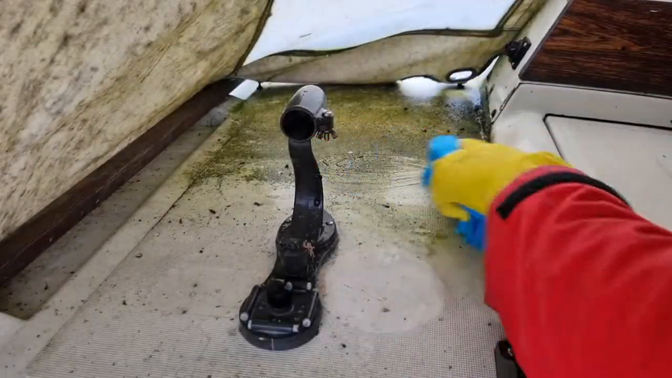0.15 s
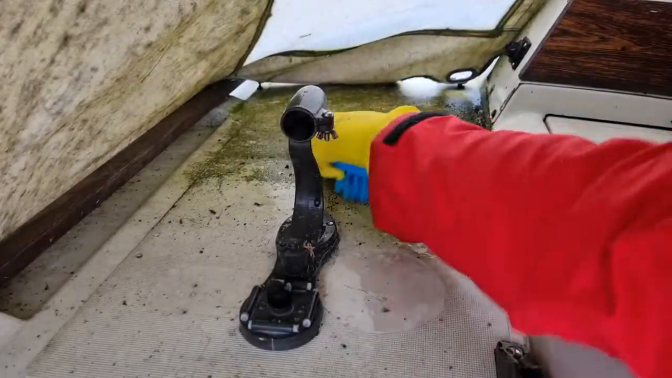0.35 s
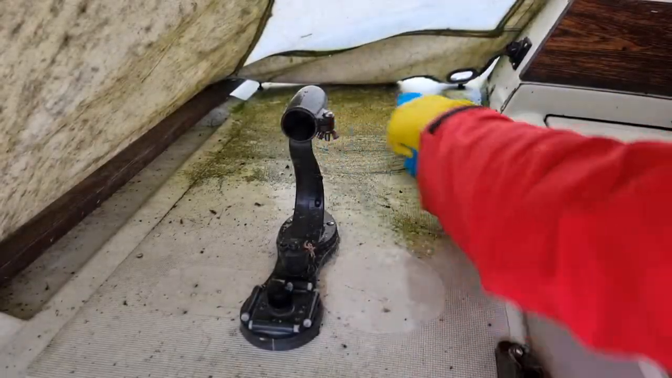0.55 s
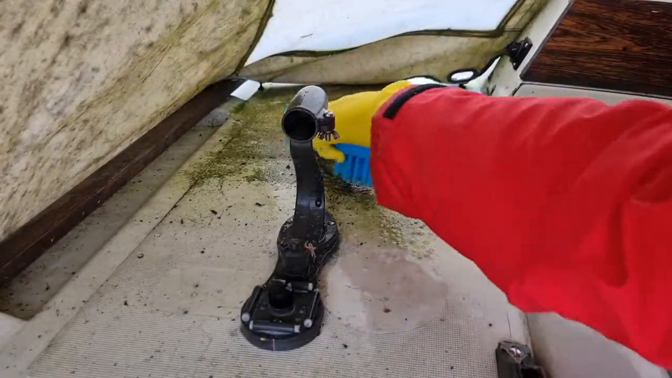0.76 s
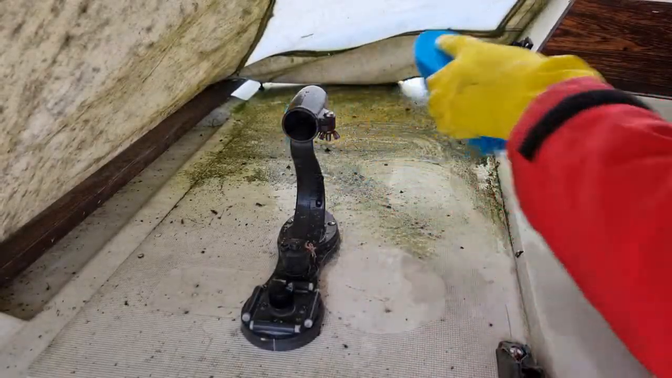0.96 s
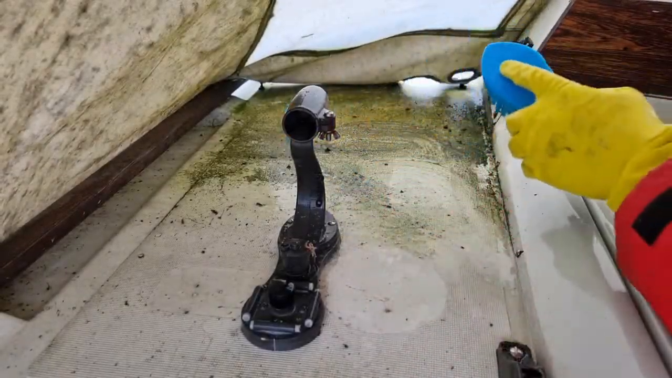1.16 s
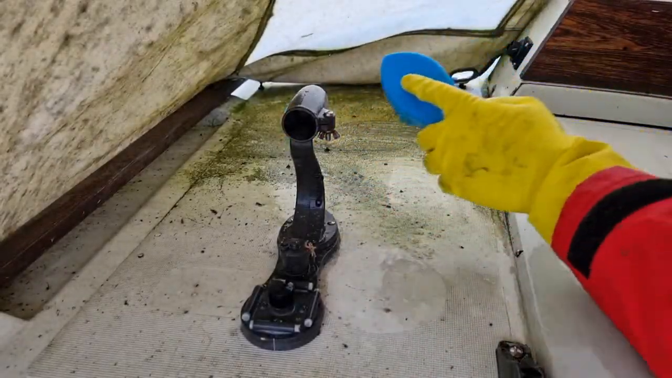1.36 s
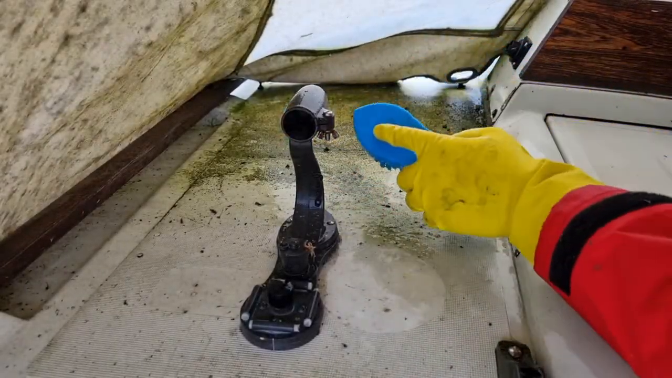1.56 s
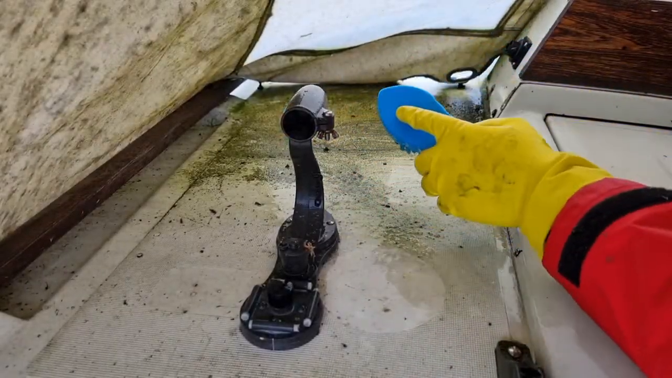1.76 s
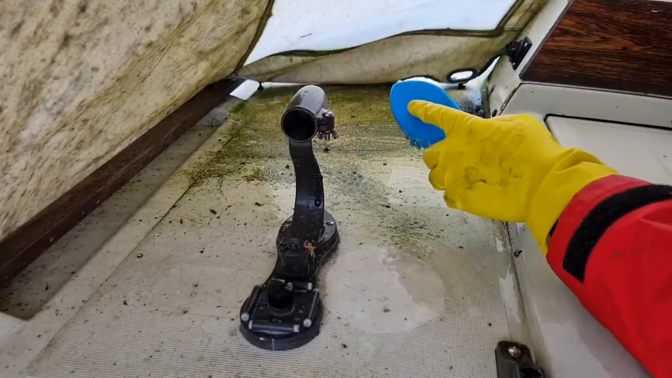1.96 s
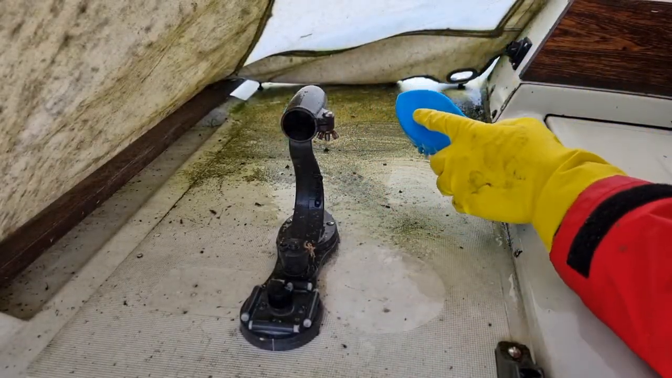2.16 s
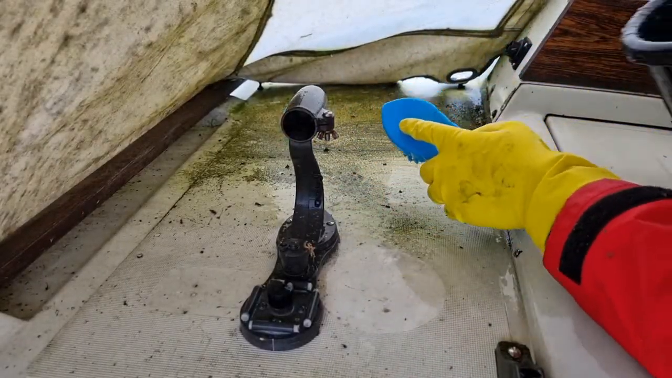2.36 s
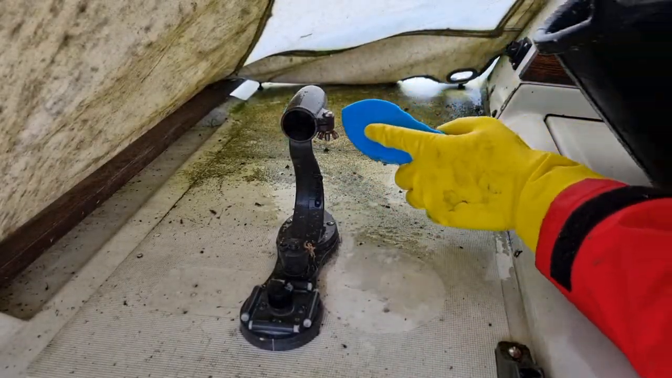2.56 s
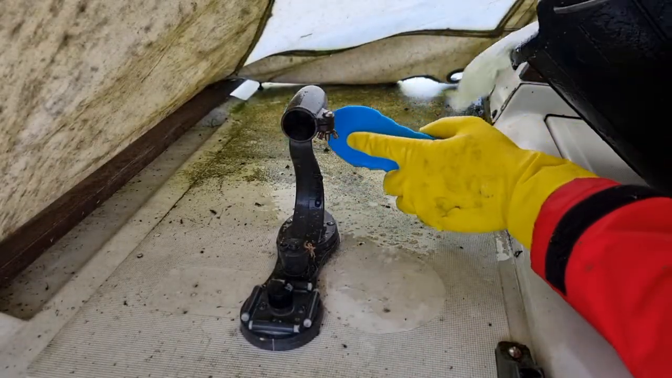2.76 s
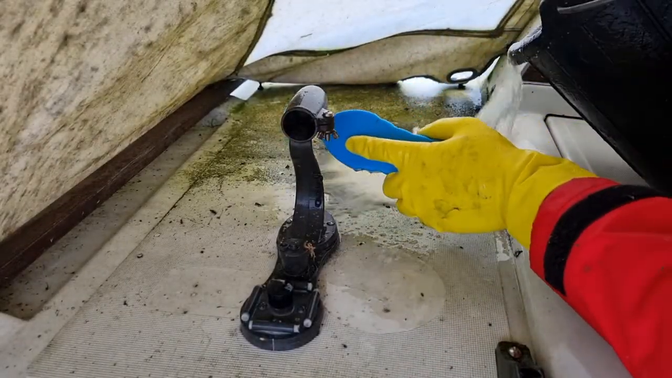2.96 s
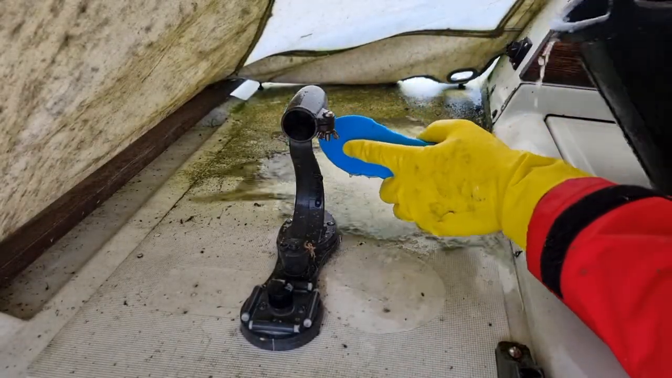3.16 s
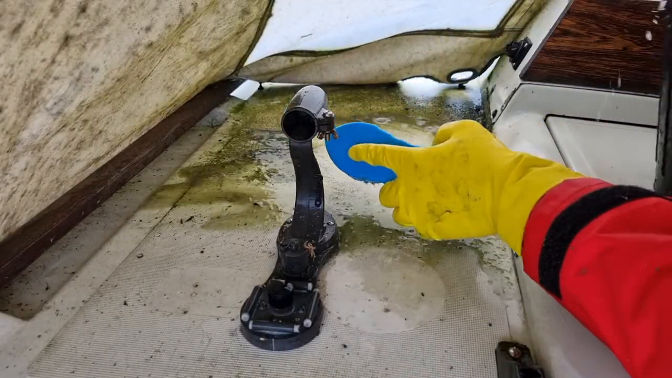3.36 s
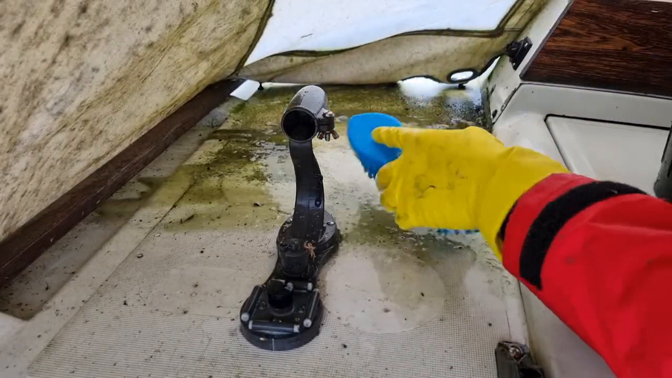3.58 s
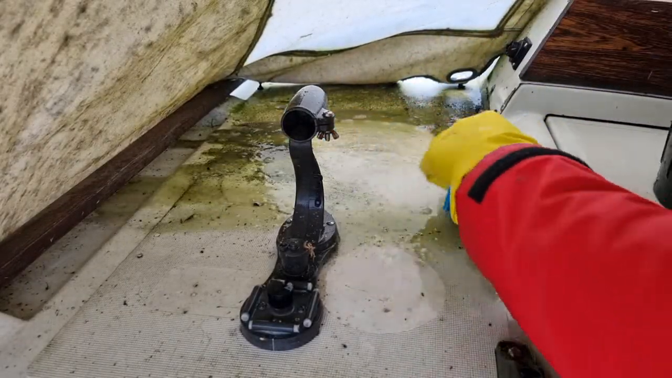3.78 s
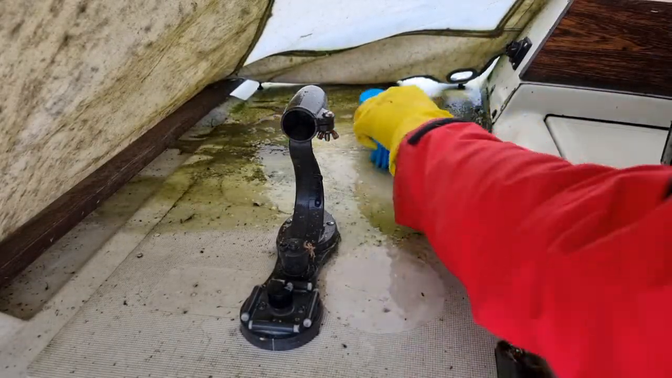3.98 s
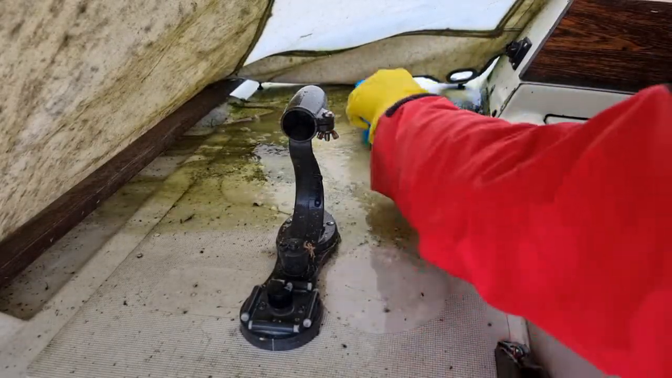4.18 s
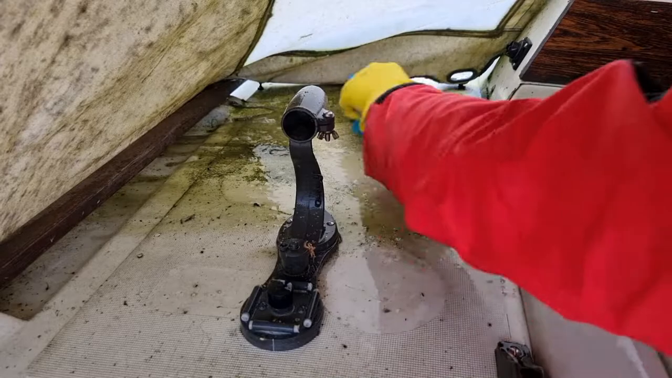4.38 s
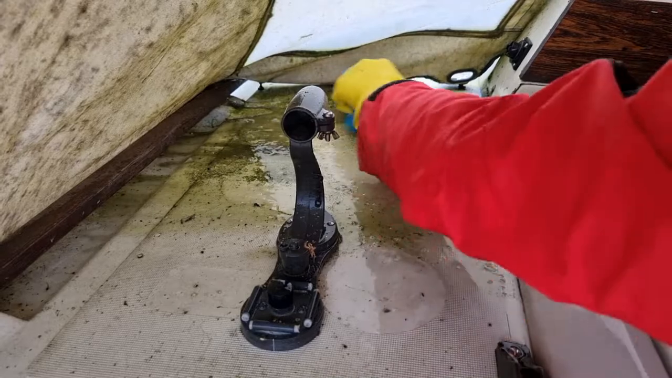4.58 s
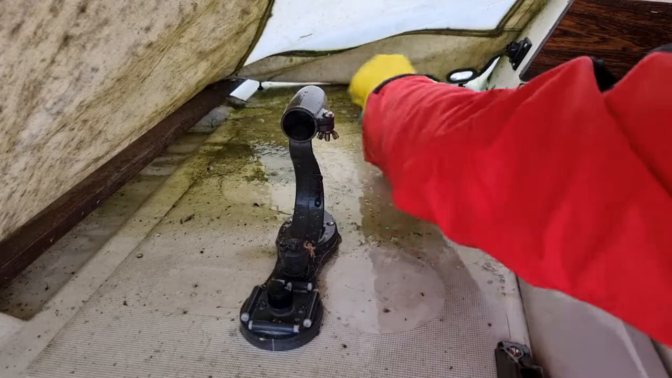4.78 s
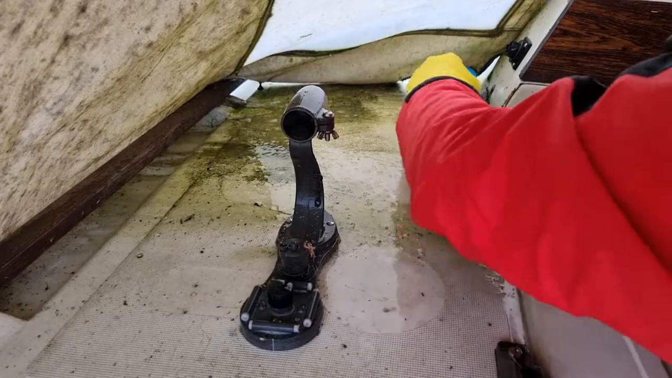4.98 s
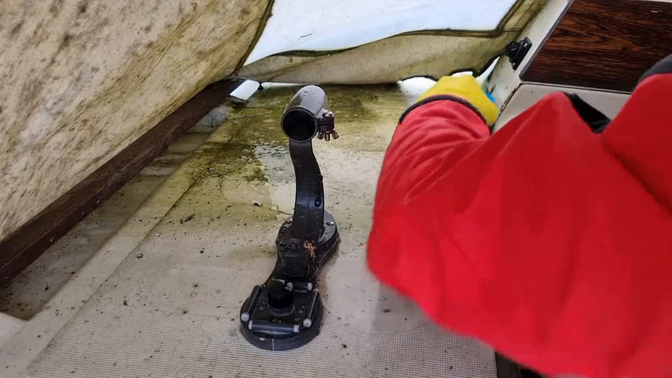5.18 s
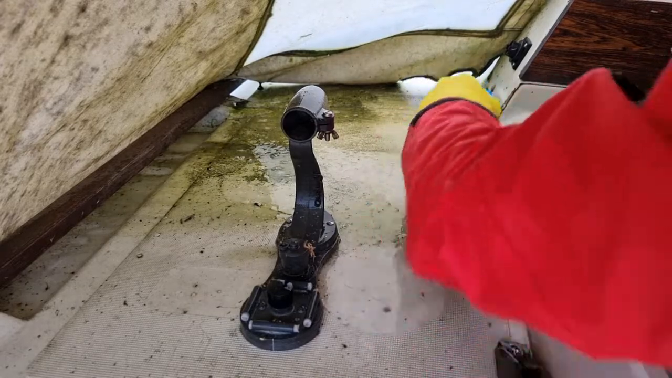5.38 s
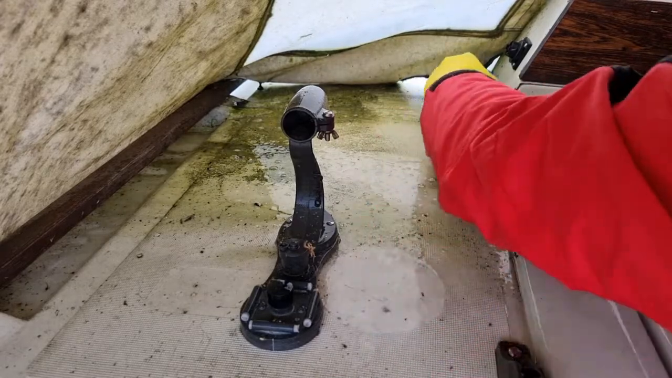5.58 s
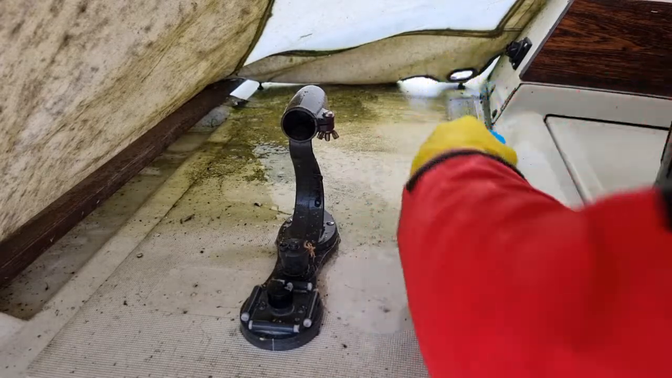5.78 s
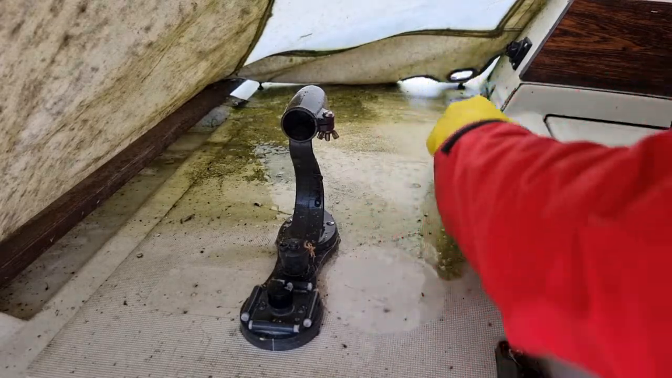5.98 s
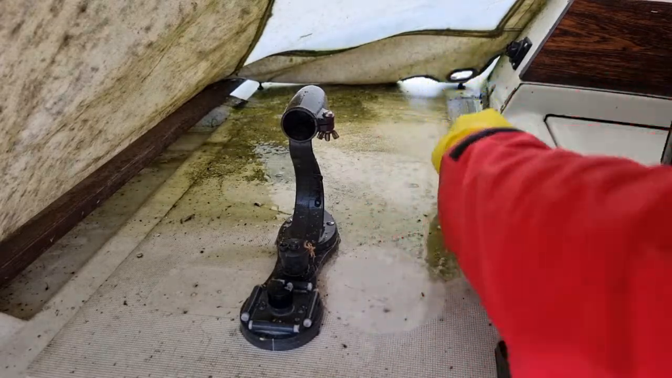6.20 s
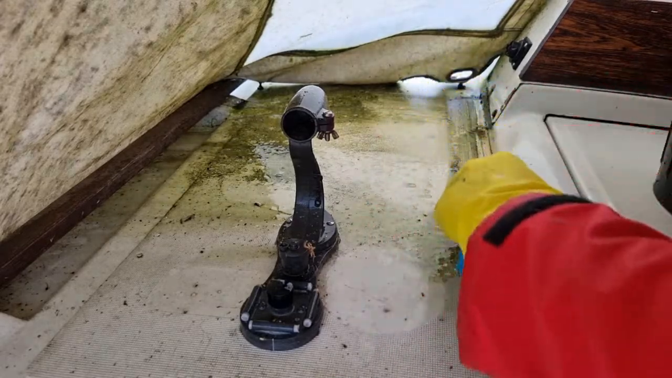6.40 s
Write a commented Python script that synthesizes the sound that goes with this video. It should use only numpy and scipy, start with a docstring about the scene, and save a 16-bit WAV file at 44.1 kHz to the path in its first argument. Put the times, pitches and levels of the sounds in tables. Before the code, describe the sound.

A stiff brush scrubs a wet hollow boat floor in raspy bursts, pausing while a bucket handle clinks and water slaps down, then knocking harder.

```python
"""A stiff brush in a gloved hand scrubs the wet fibreglass floor of a boat cockpit, under a canvas cover.
In stereo: shaped noise hisses in quick strokes, then long ones; damped modes ring as its back knocks on the deck.
In the pause a bucket is fetched: its wire handle clinks (modes driven by noise), and water is tipped out
(slaps and stream of noise, ringing bubbles). Behind it the hull rumbles, a jacket rustles and faint air hangs."""
import sys
import numpy as np
from scipy import signal
from scipy.fft import rfft, irfft, next_fast_len
from scipy.io import wavfile
from scipy.ndimage import map_coordinates

SR = 44100
rng = np.random.default_rng(int(sys.argv[2]) if len(sys.argv) > 2 else 0)


def output_pcm(signal):
    """Save a mono or channel-first signal as 16-bit PCM at the path in sys.argv[1].

    Samples are clipped to [-1, 1] before scaling.
    """
    pcm = np.clip(np.atleast_2d(signal).T, -1, 1) * 32767
    wavfile.write(sys.argv[1], SR, np.round(pcm).astype(np.int16))


N = 284004  # length [samples]


def amp(db):
    """Decibels to gain."""
    return 10 ** (np.asarray(db) / 20)


def unit(x):
    """Scaled to rms 1."""
    return x / np.sqrt(np.mean(x ** 2) + 1e-20)


def along(points, hz):
    """(frequency [Hz], value) points read on a log frequency axis."""
    f, v = np.transpose(points)
    return np.interp(np.log(hz + 1), np.log(f + 1), v)


def wobble(rate, size=N):
    """A smooth random curve with `rate` knots a second."""
    knots = rng.standard_normal(int(size * rate / SR) + 4)
    return map_coordinates(knots, [np.arange(size) * rate / SR])


def swells(rows):
    """A gain that rises and falls once for each (middle [s], length [s], level [dB]) row."""
    t = np.arange(N) / SR
    return sum(amp(db) * np.cos(np.pi * np.clip((t - s) / length, -.5, .5)) for s, length, db in rows)


def filtered(x, response):
    """x shaped by a gain that is a function of frequency."""
    n = x.shape[-1]
    m = next_fast_len(n + 4096)
    return irfft(rfft(x, m) * response(np.fft.rfftfreq(m, 1 / SR)), m)[..., :n]


# likeness of the left and right microphones: (frequency [Hz], correlation)
CHANNEL_LIKENESS = [(60, 0.27), (130, 0.34), (300, 0.28), (640, 0), (1400, 0), (15000, 0.016)]


def grains(spectrum, spiky_db, size=N):
    """Dense tiny impacts of scattered size in a spectrum, stereo, rms 1."""
    flicks = rng.standard_normal((2, size)) * amp(spiky_db * wobble(1500, size=size))

    def mid_and_side(hz):
        turn = np.arccos(np.clip(along(CHANNEL_LIKENESS, hz), -1, 1)) / 2
        return amp(along(spectrum, hz)) * [np.cos(turn), np.sin(turn)]

    mid, side = filtered(flicks, mid_and_side)
    return unit(np.array([mid + side, mid - side]))


def ring(modes, t, scatter_db):
    """Damped modes, reaching each microphone at its own random strength and phase."""
    hz, db, t60 = np.transpose(modes)[:, :, None]
    level = db + scatter_db * rng.standard_normal((2, len(modes), 1))
    phase = rng.uniform(0, 2 * np.pi, (len(modes), 1)) + 0.8 * rng.standard_normal(level.shape)
    return np.sum(amp(level - 60 * t / t60) * np.sin(2 * np.pi * hz * t + phase), axis=1)


def add(out, s, x, pan_db=0):
    """Mix a stereo sound in at time s; pan_db is left minus right."""
    i = round(s * SR)
    a, b = max(i, 0), min(i + x.shape[1], N)
    out[:, a:b] += x[:, a - i:b - i] * amp([[pan_db / 2], [-pan_db / 2]])


def glancing(x, progress, delay_ms, sweep, share, count=3):
    """x plus its bounces off near walls; a sweep above 0 shortens their paths as progress grows."""
    n, out = np.arange(x.shape[1]), x.copy()
    for k in range(1, count + 1):
        lag = k * delay_ms * SR / 1000 * rng.uniform(.8, 1.2) * (1 - sweep * progress / k ** 2)
        lags = lag + rng.normal(0, 1.04, (2, 1))  # each microphone hears the bounce at a slightly different time
        bounce = np.array([np.interp(n - d, n, c) for d, c in zip(lags, x)])
        out += share / np.sqrt(k) * bounce
    return unit(out)


# shifts of body weight on the hull: (middle [s], length [s], level [dB])
WEIGHT_SHIFTS = [(0.86, 0.29, -34), (1.15, 0.28, -32), (1.58, 0.23, -29), (1.83, 0.29, -29),
                 (2.1, 0.17, -36), (2.6, 0.2, -30), (2.78, 0.17, -25), (2.98, 0.16, -30),
                 (3.38, 0.13, -31.5), (3.52, 0.082, -23.5), (3.76, 0.22, -27.5), (5.235, 0.073, -22),
                 (6.22, 0.46, -29)]
# the bucket jostles as it is lifted: (middle [s], length [s], level [dB])
BUCKET_LIFT = [(2.48, 0.63, -38.5)]
# reaches that rustle the sleeve: (middle [s], length [s], level [dB])
SLEEVE_REACHES = [(1.0, 1.0, -45.5), (2.5, 0.49, -49.5), (3.5, 0.47, -44)]
# spectrum of the hull's rumble: (frequency [Hz], level per Hz [dB])
RUMBLE_SPECTRUM = [(12, -20), (25, -19), (45, 1.5), (72, 6), (100, 1.5), (140, -8.5), (200, -11.5),
                   (290, -23), (480, -89)]
# spectrum of the outdoor background: (frequency [Hz], level per Hz [dB])
AIR_SPECTRUM = [(180, -31), (300, -11), (725, 1), (1150, 5), (1580, -1.5), (1930, -2.5), (2320, -4.5),
                (7320, -15), (10900, -39), (13300, -13), (16000, -24)]
HULL_DB, THUMP_DB, JACKET_DB = -41, -51.5, -61.5  # rumble, soft thumping and rustle that never stop


def boat():
    """Shifting weight makes the hull rumble and thump, and reaching rustles the jacket, over faint outdoor air."""
    shifting = swells(WEIGHT_SHIFTS)
    rumbling = np.hypot(amp(HULL_DB + 0.94 * wobble(6.3)), shifting)
    rumble = rumbling * amp(1.7 * wobble(17)) * grains(RUMBLE_SPECTRUM, spiky_db=1.0)

    thumping = amp(THUMP_DB) + amp(-24) * shifting + swells(BUCKET_LIFT)
    lumps = amp(3.5 * wobble(25))
    thump_spectrum = [(80, -7.5), (160, -2.5), (340, -1.5), (600, -17.5), (1500, -36)]
    thumps = thumping * lumps * grains(thump_spectrum, spiky_db=0)

    folds = amp(1.3 * wobble(20))
    rustling = np.hypot(amp(JACKET_DB), swells(SLEEVE_REACHES))
    rustle_spectrum = [(700, -29), (2000, 8), (5000, 2.0), (10000, -3), (14000, 0.5)]
    rustle = rustling * folds * grains(rustle_spectrum, spiky_db=1.0)
    return rumble + thumps + rustle + amp(-48.5) * grains(AIR_SPECTRUM, spiky_db=1.0)


# decay of the cockpit's answer: (frequency [Hz], t60 [s])
COCKPIT_DECAY = [(150, 0.39), (700, 0.063), (3000, 0.24), (8000, 0.16), (16000, 0.13)]


def cockpit(x):
    """The short answer of the cockpit walls and the canvas: noise that decays at its own rate in each band."""
    hz, t, z = signal.stft(rng.standard_normal((2, SR // 3)), SR, nperseg=256)
    decay = amp(-60 * t / along(COCKPIT_DECAY, hz)[:, None])
    tail = signal.istft(z * decay, SR, nperseg=256)[1]
    tail = np.pad(tail / np.linalg.norm(tail[0]), ((0, 0), (SR // 300, 0)))
    return signal.fftconvolve(x, tail, axes=1)[:, :N]


# air churned into the water by the stream, then by the brush: (middle [s], length [s], level [dB])
GURGLES = [(2.923, 0.15, -31.5), (3.778, .046, -25), (3.879, 0.047, -23.5)]


def bubbles(per_s, hz, spread, cycles):
    """Clouds of small air bubbles that ring and rise in pitch."""
    out, t = np.zeros((2, N)), np.arange(SR // 40) / SR
    for middle, length, db in GURGLES:
        cloud, first, count = np.zeros((2, N)), middle - length / 2, int(per_s * length)
        starts = first + length * rng.random(count)
        for s, (pitch, size, pan) in zip(starts, rng.standard_normal((count, 3))):
            # most are near the largest size, a few are smaller and higher
            age = t * hz * np.exp(spread * abs(pitch)) / cycles
            blip = amp(1.2 * size) * np.exp(-age) * np.sin(2 * np.pi * cycles * age * (1 + 0.0064 * age))
            add(cloud, s, np.array([blip, blip * rng.choice([-1, 1])]), 4 * pan)
        level = np.std(cloud[:, int(first * SR):int((first + length) * SR)])
        out += swells([(middle, length, db)]) * cloud / level
    return out


# water slapping on the deck: (time [s], relative level [dB])
WATER_SLAPS = [(2.506, -31), (2.544, -19.5), (2.554, -15), (2.579, -16), (2.595, -17), (2.607, -20),
               (2.617, -13), (2.639, -16), (2.676, -21.5), (2.703, -29), (3.76, -16.5)]
# spectrum of a slap: (frequency [Hz], level per Hz [dB])
SPLAT_SPECTRUM = [(240, -37), (400, -18), (504, -27), (545, -6), (789, -2.5), (1060, -8), (1330, 0),
                  (2150, -17.5), (3020, -9.5), (4050, -11), (5780, -13), (16000, -13)]
# water tipped from the bucket: (start [s], level [dB], rise [s], fall [dB per s])
BUCKET_POURS = [(2.799, -28.5, 0.013, 42.5), (3.31, -42, .17, 53)]
# spectrum of the stream: (frequency [Hz], level per Hz [dB])
STREAM_SPECTRUM = [(880, -45), (1500, -14), (1830, -36), (1980, -16), (3880, -7), (11200, -11), (14100, -5),
                   (16000, -12)]


def water():
    """Gobs slap on the deck, a stream gurgles and dwindles, and the brush lands in it."""
    out, t = np.zeros((2, N)), np.arange(SR // 8) / SR
    for s, db in WATER_SLAPS:
        slap = amp(db - 6 - 60 * t / 0.079) * (1 - np.exp(-t / 0.00094))
        add(out, s, slap * grains(SPLAT_SPECTRUM, spiky_db=-0.5, size=len(t)))

    now, flow = np.arange(N) / SR, np.zeros(N)
    for s, db, rise, fall in BUCKET_POURS:
        flow += np.clip((now - s) / rise, 0, 1) * amp(db - fall * np.maximum(now - s - rise, 0))
    stream = flow * amp(2.2 * wobble(70) + 0.64 * wobble(43)) * grains(STREAM_SPECTRUM, spiky_db=2)
    return out + stream + bubbles(per_s=1000, hz=1346, spread=0.419, cycles=12.0)


# the bucket handle moving in its lugs:
# (time [s], relative level [dB], left minus right [dB], slide time [s], relative ring level [dB])
HANDLE_CLINKS = [(1.113, -11, 0, 0.012, 8), (1.393, -17, -3.5, 0.021, 0), (1.646, -28.5, -5, 0.0062, -17),
                 (1.709, -38.5, -4, .012, -9), (1.799, -28.5, 0, 0.0089, -11),
                 (1.953, -32.5, -2, 0.022, -4)]
# modes of the wire handle: (frequency [Hz], level [dB], t60 [s])
WIRE_MODES = [(5440, -20, 0.074), (8120, -16, 0.1), (9330, -10, 0.064), (9800, -18, 0.079),
              (10600, -16, 0.12), (12660, 2, 0.072), (12400, -7, 0.089), (12400, -15, 0.11),
              (13610, -24, 0.17), (13950, -13, 0.1), (14600, 0, 0.077), (15700, -16, 0.1)]
# spectrum of the scratch in the lugs: (frequency [Hz], level per Hz [dB])
LUG_SPECTRUM = [(1500, -37), (2800, -13), (6000, -6), (10000, -9.5), (13000, -15), (16000, -10.5)]


def handle():
    """The wire handle chatters in its lugs as it slides, and rings."""
    out, t = np.zeros((2, N)), np.arange(SR // 4) / SR
    for s, db, pan_db, slide, ring_db in HANDLE_CLINKS:
        contact = np.exp(-t / max(slide, .002)) * (1 - np.exp(-t / 0.0041))
        lug = grains(LUG_SPECTRUM, spiky_db=2.5, size=len(t))
        scratch = contact * glancing(lug, t, delay_ms=0.76, sweep=0, share=0.79)
        chatter = contact ** 2 * rng.standard_normal(len(t))
        wire = signal.fftconvolve(ring(WIRE_MODES, t, scatter_db=1), chatter[None], axes=1)[:, :len(t)]
        wire /= np.abs(wire).max()
        add(out, s, amp(db - 4.5) * scratch + amp(db + ring_db - 6.5) * wire, pan_db)
    return out


# bumps of the brush on the deck:
# (time [s], relative level [dB], clack relative to thud [dB], centre of the thud [Hz])
DECK_KNOCKS = [(0.208, -16, -5, 300), (0.302, -14.5, -7, 490), (0.534, -16, -13, 165),
               (1.4, -32.5, -32, 678), (1.51, -26.5, -16, 209), (1.768, -18.5, -38, 200),
               (2.112, -34.5, -5.5, 219), (2.217, -24, -18, 254), (2.312, -17.5, -48, 212),
               (3.48, -13, -12.5, 290), (3.625, -27.5, -17, 380), (4.199, -13.5, -6.5, 342),
               (4.305, -14.5, -2, 300), (4.403, -22, -3.5, 240), (4.512, -14.5, -8, 428),
               (4.608, -21.5, -1.5, 256), (4.731, -10, -5, 428), (4.758, -9, -16, 484),
               (4.825, -15.5, -11, 348), (5.015, -10, -3, 412), (5.104, -10.5, -16, 550),
               (5.161, -6.5, -6.5, 470), (5.317, -6.5, -8, 486), (5.455, -8, -7.5, 314),
               (5.475, -15, -13, 310), (5.541, -14.5, -13.5, 286), (5.583, -9, -9, 343),
               (5.654, -8, -6.5, 435), (5.889, -23.5, -4, 754), (5.995, -6, -7, 483),
               (6.11, -19.5, -5, 268), (6.392, -30.5, -1.5, 347)]
# modes of the hollow deck panel, before detuning: (frequency [Hz], level [dB], t60 [s])
DECK_MODES = [(149, -6.5, 0.16), (212.5, -3.5, 0.11), (262.6, -8, 0.12), (309.6, -5, 0.1), (375, -4, 0.096),
              (433, -4.5, 0.097), (500, 0.5, 0.067), (537, -14.5, 0.077), (692, -12.5, 0.089),
              (831, -10, 0.041), (912, -13, 0.09)]
# spectrum of the brush's plastic back: (frequency [Hz], level per Hz [dB])
CLACK_SPECTRUM = [(400, -13), (700, -3.5), (950, -0.5), (1250, 1.5), (1500, -2.5), (1780, 0.5), (2200, -6),
                  (3100, -9), (4500, -21), (9000, -19), (16000, -38)]
THUD_PAN_DB, CLACK_PAN_DB = 2, -0.5  # left minus right


def knocks():
    """The plastic back clacks and rattles; the hollow panel rings, mostly in modes near each thud's centre."""
    out, t = np.zeros((2, N)), np.arange(SR // 3) / SR
    for s, db, clack_db, centre_hz in DECK_KNOCKS:
        # the hand's weight detunes the panel from spot to spot
        detune = np.exp(0.041 * rng.standard_normal(len(DECK_MODES)))
        modes = [(hz * k, level - 5.2 * np.log2(hz / centre_hz) ** 2, t60)
                 for k, (hz, level, t60) in zip(detune, DECK_MODES)]
        # the many small modes of the moulding blur into a short hollow burst
        hollow_spectrum = [(centre_hz / 3, -14), (centre_hz, 0), (centre_hz * 2, -9),
                           (centre_hz * 4, -30), (centre_hz * 10, -70)]
        hollow = grains(hollow_spectrum, spiky_db=0.0, size=len(t))
        thud = unit(ring(modes, t, scatter_db=2.5)) + amp(-2.5) * unit(hollow * amp(-60 * t / .11))
        rise = 0.0019 * amp(-.4 * (clack_db + 10))  # [s]: a soft contact builds up more slowly
        thud *= 1 - np.exp(-t / rise)
        thud /= np.std(thud[:, :SR // 50])

        crack = amp(3.0 - 60 * t / 0.042) * (1 - np.exp(-t / (0.5 * rise)))
        rattle = amp(3.5 * wobble(130, size=len(t)) - 9 - 60 * t / 0.12) * (1 - np.exp(-t / 0.004))
        clack = grains(CLACK_SPECTRUM, spiky_db=4.5, size=len(t)) * (crack + rattle)
        add(out, s, amp(db - 8.5) * thud, THUD_PAN_DB)
        add(out, s, amp(db + clack_db) * clack, CLACK_PAN_DB)
    return out


# brush strokes: (start [s], end [s], bristle hiss [dB], extra weight on the brush [dB])
BRUSH_STROKES = [(-0.02, 0.215, -17.5, 1), (0.138, 0.343, -14, -1), (0.297, 0.496, -19.5, -1),
                 (0.411, 0.719, -17, 5), (0.613, 0.771, -29, -2), (3.752, 3.919, -23.5, 3),
                 (3.85, 3.975, -12, -3.5), (3.968, 4.078, -13.5, 0), (4.065, 4.177, -12, -0.5),
                 (4.179, 4.273, -15, 3.5), (4.272, 4.382, -14.5, 1), (4.381, 4.486, -14.5, 1),
                 (4.486, 4.581, -13.5, 2), (4.588, 4.696, -16.5, 7), (4.7, 4.792, -15.5, 5.5),
                 (4.8, 4.91, -16.5, 6), (4.904, 4.986, -25, 1.5), (4.962, 5.054, -24.5, 0.5),
                 (5.016, 5.272, -21, -4), (5.266, 5.518, -21.5, -2), (5.525, 5.863, -18, -1),
                 (5.834, 6.067, -22.5, -1), (6.064, 6.339, -21.5, 1), (6.349, 6.52, -25, -3.5)]
# spectrum of the bristles' hiss: (frequency [Hz], level per Hz [dB])
BRISTLE_SPECTRUM = [(1060, -34), (1800, -1.5), (2010, -6.5), (2240, -9.5), (2920, -3), (3440, -4.5),
                    (5490, -1), (7840, -0.5), (8520, -4.5), (11100, -4), (14200, 2), (15100, 2),
                    (16000, -14)]
# spectrum of the scrape: (frequency [Hz], level per Hz [dB])
SCRAPE_SPECTRUM = [(350, -31), (700, 0.5), (1150, 2.5), (1450, 1.5), (1900, 0.5), (2500, 0.5),
                   (4000, -12.5), (8000, -50)]
# spectrum of the drumming deck: (frequency [Hz], level per Hz [dB])
DRUM_SPECTRUM = [(40, -28), (90, 5.5), (150, 3), (260, 0.5), (400, 2), (520, -4), (680, -5.5), (1100, -3),
                 (3000, -45)]
# spectrum of the deck bending under the brush: (frequency [Hz], level per Hz [dB])
FLEX_SPECTRUM = [(25, -8), (50, 1), (85, 6), (120, -0.5), (170, -11), (400, -39)]
PEAK_SHARE, PEAK_EARLIER_PER_S = 0.65, 0.64  # where in a stroke the brush is fastest; long strokes peak earlier
SCRAPE_DB, DRUM_DB, FLEX_DB = -13.5, -15.5, -12.5  # base levels of scrape, drumming and flexing beside the hiss
SCRAPE_PER_WEIGHT, FLEX_PER_WEIGHT = 0.37, 0.59  # [dB per dB of weight]


def brush():
    """Each stroke speeds up and stops; bristles flick over the non-slip grain, and weight drums and flexes the deck."""
    out = np.zeros((2, N))
    for start, end, db, weight_db in BRUSH_STROKES:
        length = end - start
        size = int(length * SR)
        fastest = np.clip(PEAK_SHARE - PEAK_EARLIER_PER_S * length, .1, .9)
        progress = np.interp(np.arange(size) / size, [0, fastest, 1], [0, .5, 1])
        speed = np.abs(np.sin(np.pi * progress))

        # faint strokes give a fine wet fizz, loud ones a fuller rasp around 5.2 kHz
        rasp = [(hz, level + 0.34 * (db + 25.5) * np.exp(-np.log(hz / 5200) ** 2 / 0.83))
                for hz, level in BRISTLE_SPECTRUM]
        hiss = grains(rasp, spiky_db=2.0, size=size)
        hiss = glancing(hiss, progress, delay_ms=1.6, sweep=0.271, share=0.5)
        scrape = grains(SCRAPE_SPECTRUM, spiky_db=1.0, size=size)
        scrape = glancing(scrape, progress, delay_ms=1.8, sweep=0.25, share=1.0)
        drum = grains(DRUM_SPECTRUM, spiky_db=0.5, size=size)
        flex = grains(FLEX_SPECTRUM, spiky_db=1.5, size=size)

        catch = wobble(74.8, size=size)  # tufts catch and let go
        bite = 5 * (.5 - progress)  # [dB]: they dig in hardest just after the turn
        load_db = weight_db - .5 * (db + 19.5)  # the deck follows weight fully, the hiss level by half
        scrape_db = SCRAPE_DB + SCRAPE_PER_WEIGHT * weight_db + bite + 2.8 * catch
        drumming = amp(DRUM_DB + bite + 2.6 * catch) * drum
        flexing = amp(FLEX_DB + FLEX_PER_WEIGHT * weight_db) * flex

        stroke = speed ** 1.49 * amp(0.73 * catch) * hiss
        stroke += speed ** 1.33 * amp(scrape_db) * scrape
        stroke += speed ** 0.79 * amp(load_db) * (drumming + flexing)
        add(out, start, amp(db) * stroke)
    return out


def scene():
    """All the work on the deck, its reflections and the boat around it."""
    work = brush() + knocks() + handle() + water()
    return work + amp(-12.0) * cockpit(work) + boat()


TOP_HZ = 15900  # upper band limit


def record(dry):
    """The microphone chain rounds off the highest peaks and passes almost nothing above its band limit."""
    rounded = dry / (1 + np.abs(dry / .95) ** 6) ** (1 / 6)
    return filtered(rounded, lambda hz: 1 / (1 + (hz / TOP_HZ) ** 200))


dry = scene()
out = record(dry)
output_pcm(out)
```